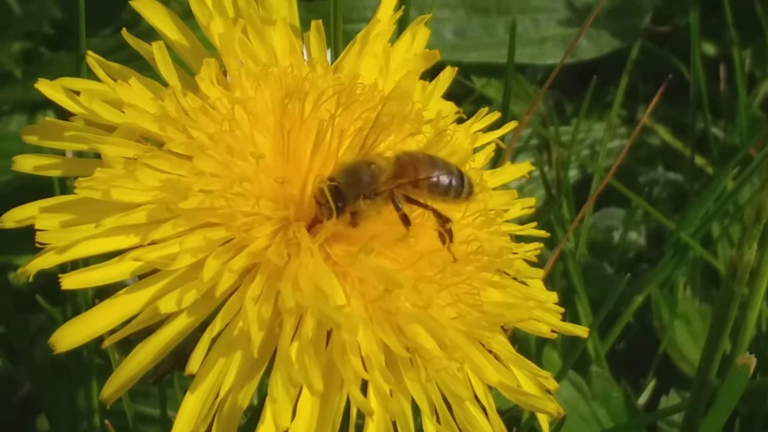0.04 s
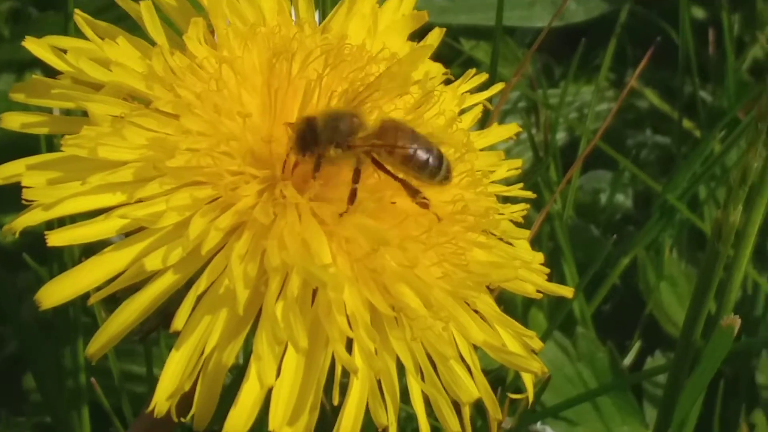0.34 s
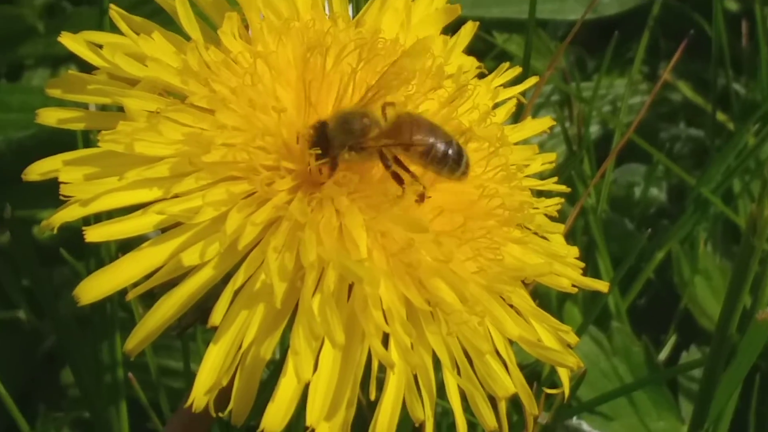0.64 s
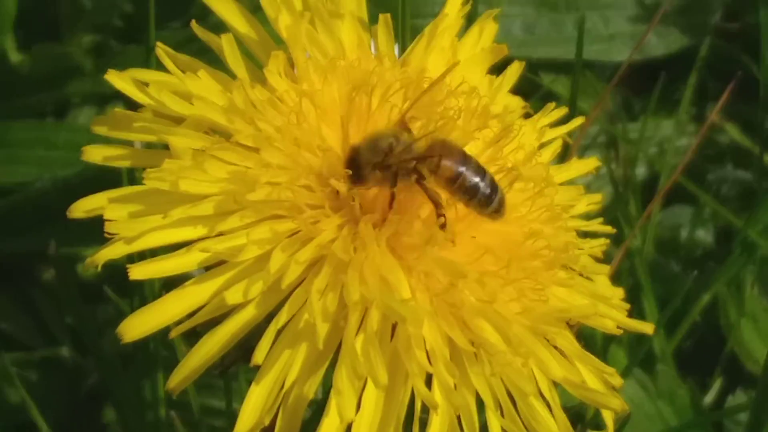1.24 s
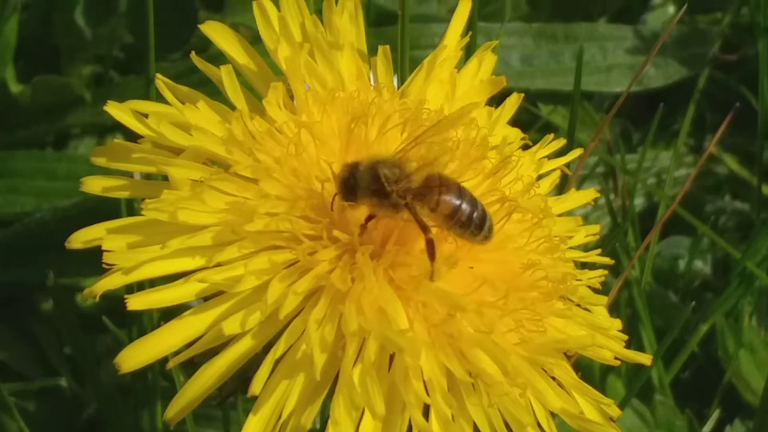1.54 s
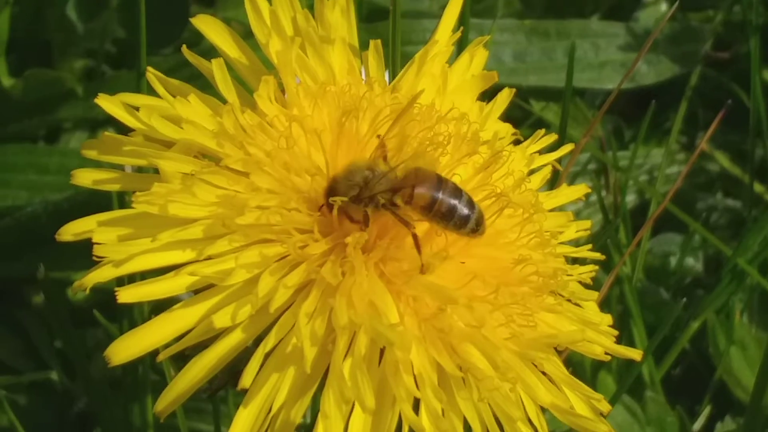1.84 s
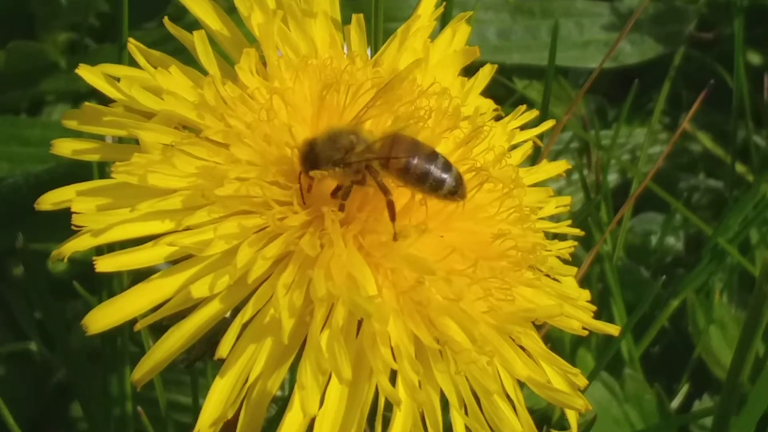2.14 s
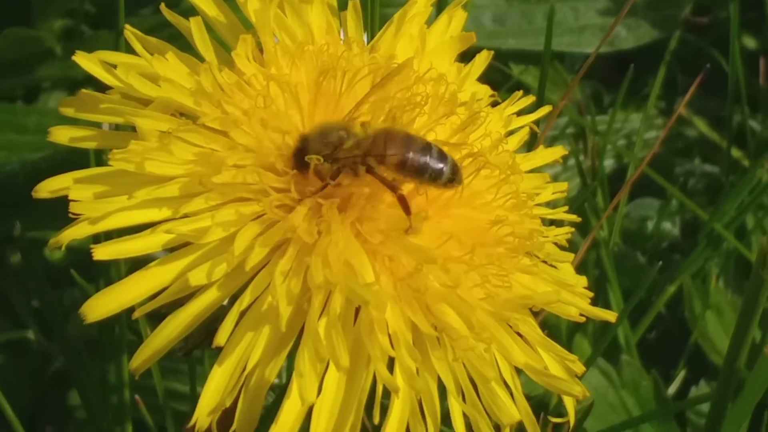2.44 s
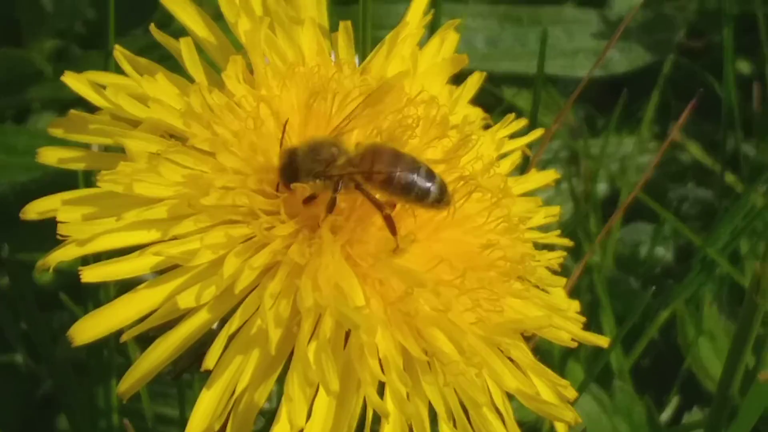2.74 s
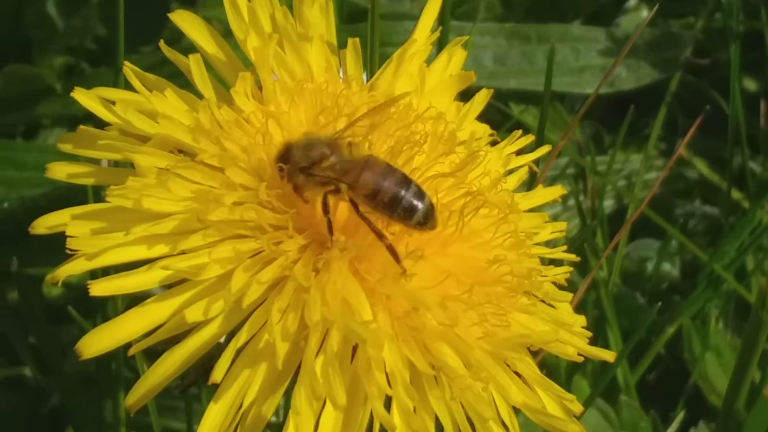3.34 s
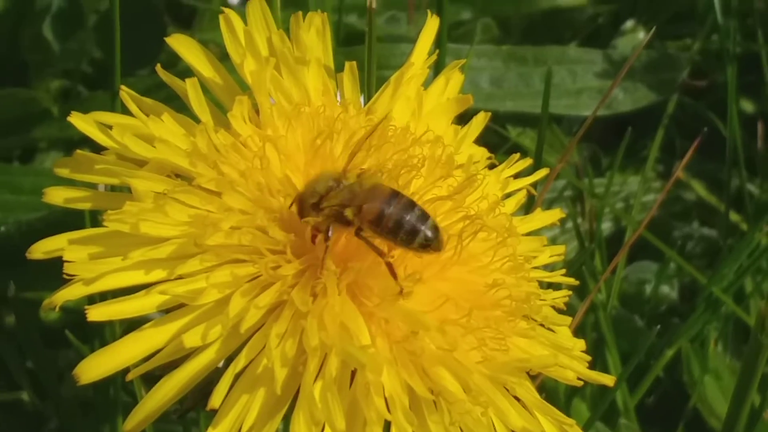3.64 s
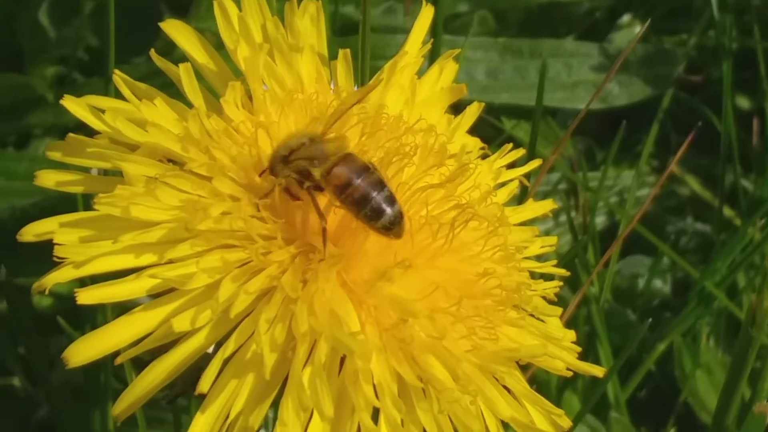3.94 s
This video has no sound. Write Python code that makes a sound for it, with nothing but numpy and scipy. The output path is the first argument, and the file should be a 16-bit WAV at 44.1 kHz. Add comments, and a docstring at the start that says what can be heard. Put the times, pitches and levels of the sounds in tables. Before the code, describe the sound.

Faint birdsong, with falling trills and thin whistles, over soft outdoor rumble and hiss.

```python
"""A quiet meadow over low rumble and hiss; far chirps, grass ticks and soft taps on a hand-held camera
dot it throughout. At 0.5 s a songbird gives a falling trill of quick upward flicks. Something, perhaps
a frog, rattles at 1.0 and 2.7 s: clicks ringing in a throat. A second, nearer trill falls at 2.9 s.
From 3.1 s a mellow whistle climbs; from 3.3 s another bird gives three thin whistles.
At 3.8 s the camera takes one bump with a short scrape."""
import sys
import numpy as np
from scipy import signal
from scipy.fft import rfft, irfft, next_fast_len
from scipy.io import wavfile
from scipy.ndimage import map_coordinates

SR = 44100
rng = np.random.default_rng(int(sys.argv[2]) if len(sys.argv) > 2 else 0)


def master_out(mix):
    """Clip the mix to full scale and print it as 16-bit PCM to the path in sys.argv[1]."""
    frames = np.transpose(np.atleast_2d(mix))
    ceiling = np.clip(frames, -1, 1)
    pcm = np.round(ceiling * 32767).astype(np.int16)
    wavfile.write(sys.argv[1], SR, pcm)


N = 176400
TIME_S = np.arange(N) / SR


def amp(db):
    """Decibels to gain."""
    return 10 ** (np.asarray(db) / 20)


def unit(x):
    """Scale to rms 1."""
    return x / np.sqrt(np.mean(x ** 2) + 1e-20)


def along(points, hz):
    """Read (freq_hz, value) points on a log frequency axis."""
    freq_hz, values = np.transpose(points)
    return np.interp(np.log(hz + 1), np.log(freq_hz + 1), values)


def curves(rows, t):
    """Each column after time_s, read at times t."""
    time_s, *columns = np.transpose(rows)
    return [np.interp(t, time_s, column) for column in columns]


def clock(length_s):
    """Sample times of a span."""
    return np.arange(int(length_s * SR)) / SR


def wobble(rate_hz, size=N):
    """Smooth random curve, rate_hz knots a second."""
    return map_coordinates(rng.standard_normal(N // 20), [np.arange(size) * rate_hz / SR])


def filtered(x, response):
    """Apply a gain given as a function of frequency."""
    size = next_fast_len(N + SR // 2)
    return irfft(rfft(x, size) * response(np.fft.rfftfreq(size, 1 / SR)), size)[..., :N]


def noise(colour):
    """Coloured noise of rms 1."""
    return unit(filtered(rng.standard_normal(N), lambda hz: amp(along(colour, hz))))


def add(out, start_s, x):
    """Mix x into out."""
    part = out[max(0, round(start_s * SR)):][:len(x)]
    part += x[:len(part)]


def tone(hz):
    """Sine of rms 1 following a pitch."""
    return np.sqrt(2) * np.sin(2 * np.pi * np.cumsum(hz) / SR)


def struck(colour, size=16384):
    """Minimum-phase impulse response with this spectrum."""
    cepstrum = irfft(np.log(amp(along(colour, np.fft.rfftfreq(size, 1 / SR)))))
    cepstrum[1:size // 2] *= 2
    cepstrum[size // 2 + 1:] = 0
    return irfft(np.exp(rfft(cepstrum)))


def knocks(rows):
    """Small contacts, each a few swings that swell and die."""
    out, t = np.zeros(N), clock(1 / 8)
    for start_s, pitch_hz, swell_s, level_db in rows:
        u = t / swell_s
        envelope = amp(level_db) * (u * np.exp(1 - u)) ** 3
        add(out, start_s, envelope * np.sin(2 * np.pi * pitch_hz * t))
    return out


def meadow(x, wet_db):
    """Add quick scatter from plants and a longer echo from trees."""
    t = clock(.6)

    def tail(t60_s):
        envelope = amp(-60 * t / t60_s) * (1 - np.exp(-t / .01))
        return unit(rng.standard_normal(len(t)) * envelope) / np.sqrt(len(t))

    scatter = amp(-5.5) * tail(t60_s=.099)
    echo = amp(-7) * tail(t60_s=.46)
    return x + amp(wet_db) * signal.fftconvolve(x, scatter + echo)[:len(x)]


def rumble():
    """Uneven low noise with a wavering drone."""
    # rumble spectrum: freq_hz, gain_db
    colour = [(15, -45), (25, -21.5), (45, -7), (65, 1.5), (92, -2.5), (186, -7), (244, -8.5), (330, -18),
              (401, -23), (445, -24.5), (619, -33), (786, -35.5), (900, -33), (1170, -61), (1980, -120)]
    # rumble contour: time_s, relative_db
    contour = [(0.0, -56.5), (0.32, -61.5), (0.36, -58.5), (1.03, -63.5), (1.21, -57), (1.3, -61.5),
               (1.67, -66.5), (1.7, -63), (1.72, -63.5), (2.3, -66), (2.41, -61.5), (2.6, -67.5),
               (3.04, -60.5), (3.48, -65.5), (3.71, -64.5), (3.75, -58.5)]
    drone_hz, drone_db = 62.6, -65
    low = amp(curves(contour, TIME_S)[0] + .5 + 1.53 * wobble(17)) * noise(colour)
    drone = amp(drone_db + 2.5 * wobble(11)) * tone(drone_hz + 3.47 * wobble(12))
    return low + drone


def rustle():
    """Soft flickering noise in the low mids."""
    # rustle contour: time_s, relative_db
    contour = [(0.0, -77), (0.08, -73), (0.31, -72.5), (0.59, -80), (0.87, -78), (1.26, -73.5),
               (1.42, -77.5), (1.83, -81), (2.51, -79), (3.08, -77.5), (3.3, -81.5), (3.48, -79),
               (3.75, -75)]
    # rustle spectrum: freq_hz, gain_db
    colour = [(150, -30), (380, -1), (560, -3.5), (800, -7.5), (1300, -15), (2500, -36.5)]
    return amp(curves(contour, TIME_S)[0] - 3.5 + 2.4 * wobble(40)) * noise(colour)


def chorus():
    """Far birds blurred into a wash of treble noise."""
    # chorus contour: time_s, relative_db
    contour = [(0, -85), (.5, -81), (.9, -86), (1.1, -78.5), (1.45, -86.5), (1.65, -93), (2.55, -92),
               (2.65, -84), (2.86, -76), (2.95, -81.5), (3.4, -81.5), (4, -83.5)]
    # chorus spectrum: freq_hz, gain_db
    colour = [(2000, -45), (3000, -4), (3600, 1.5), (4400, -8.5), (5100, -1), (6500, -6), (7500, -33)]
    return amp(curves(contour, TIME_S)[0] + 1.5 + 1.4 * wobble(50)) * noise(colour)


def hiss(level_db=-72.5):
    """Steady air and microphone hiss, wider in the treble."""
    # hiss spectrum: freq_hz, gain_db
    colour = [(410, -40), (700, -4), (777, -4.5), (919, -8), (1070, -3.5), (1180, -6), (1810, -5.5),
              (1950, -6), (2250, -7), (2530, -6.5), (3330, -8), (3890, -5.5), (6280, -11), (9160, -14),
              (15600, -6)]
    # left-right likeness: freq_hz, correlation
    likeness = [(1000, 0.93), (4000, 1), (6500, 0.66), (9000, 0.24), (15000, 0.74)]

    def mid_side_gains(hz):
        angle_rad = np.arccos(np.clip(along(likeness, hz), -1, 1)) / 2
        return np.array([np.cos(angle_rad), np.sin(angle_rad)])

    mid, side = filtered(np.array([noise(colour), noise(colour)]), mid_side_gains)
    return amp(level_db) * np.array([mid + side, mid - side])


def chirps(rough_hz=130):
    """Short rough glides from far birds."""
    # distant calls: start_s, length_s, first_hz, last_hz, level_db
    glides = [(0, 0.045, 3380, 3600, -76), (.12, 0.028, 5200, 5300, -77.5), (.255, .03, 5050, 5400, -77),
              (.31, 0.031, 3700, 3540, -78), (0.316, .018, 6600, 5860, -78.5),
              (0.932, 0.023, 3850, 3320, -77), (.97, 0.065, 3230, 3060, -78),
              (1.413, 0.063, 3720, 4030, -76.5), (1.504, 0.025, 4270, 3780, -77.5),
              (1.786, .02, 6500, 5700, -80), (1.907, .028, 6500, 5750, -76),
              (2.042, 0.029, 6550, 5650, -71), (2.503, 0.042, 5000, 4800, -79),
              (2.6, 0.099, 3930, 3360, -76.5), (2.728, 0.076, 3310, 4450, -71),
              (2.766, .05, 3400, 3900, -76), (2.91, .13, 780, 797, -75.5), (3.0, .1, 3700, 3500, -72),
              (3.56, .08, 2520, 2670, -80.5), (3.679, 0.06, 2070, 1800, -78.5)]
    out = np.zeros(N)
    for start_s, length_s, first_hz, last_hz, level_db in glides:
        u = clock(length_s) / length_s
        pitch_hz = first_hz + (last_hz - first_hz) * u + rough_hz * wobble(500, len(u))
        add(out, start_s, amp(level_db) * np.sin(np.pi * u) * tone(pitch_hz))
    return out


def grass_ticks():
    """Tiny dry contacts in the grass."""
    # ticks: start_s, pitch_hz, swell_s, level_db
    ticks = [(.074, 5700, .0004, -61), (.433, 6200, .0004, -60.5), (.885, 2500, 0.00054, -56),
             (.8853, 4700, 0.0002, -52.5), (2.2261, 1500, .0004, -61), (2.5961, 1580, 0.00092, -47.5),
             (2.803, 5200, .0003, -62), (2.838, 6100, 0.00037, -58.5), (3.524, 6100, .0004, -62)]
    return knocks(ticks)


def camera_taps():
    """Soft low knocks on the hand-held camera."""
    # taps: start_s, pitch_hz, swell_s, level_db
    taps = [(.3808, 280, 0.0013, -42.5), (.3812, 604, 0.0014, -52.5), (.515, 800, 0.0025, -63.5),
            (1.15, 705, 0.002, -61.5), (1.172, 193, 0.01, -50), (1.193, 197, 0.01, -52),
            (1.197, 401, 0.0074, -57.5), (1.375, 362, .006, -60), (1.69, 115, 0.01, -47),
            (1.753, 130, 0.0085, -51.5), (2.2257, 600, 0.00085, -54), (2.843, 148, .014, -54.5),
            (3.01, 209.7, .025, -57)]
    return knocks(taps)


def trill(contour, start_s, gap_s, count):
    """Upward flicks that slow as their pitch sinks, each scattered anew by the plants."""
    syllable_s, slowing_s, jitter_s, rough_hz = .021, .00023, .0007, 70
    out = np.zeros(N)
    u = clock(syllable_s) / syllable_s
    flick = u ** 3 + u / 2  # steepest at the end
    flick -= flick[len(u) // 2]
    for k in range(count):
        centre_s = start_s + gap_s * k + slowing_s * k * k + jitter_s * rng.normal()
        centre_hz, sweep_hz, level_db = curves(contour, centre_s)
        pitch_hz = centre_hz + sweep_hz * flick + rough_hz * wobble(725, len(u))
        syllable = amp(level_db - .5 + rng.normal()) * np.sin(np.pi * u) * tone(pitch_hz)
        add(out, centre_s - syllable_s / 2, meadow(np.pad(syllable, (0, SR // 3)), wet_db=1))
    return out


def songbird():
    """Two falling trills, far then near."""
    # far trill contour: time_s, pitch_hz, sweep_scale_hz, relative_db
    far = [(.46, 5100, 1000, -82), (.55, 4100, 900, -73.5), (.615, 3680, 800, -69), (.68, 3460, 950, -68.5),
           (.725, 3187, 750, -65), (.79, 3080, 650, -65.5), (.825, 2870, 500, -76)]
    # near trill contour: time_s, pitch_hz, sweep_scale_hz, relative_db
    near = [(2.93, 5700, 500, -66), (2.96, 5380, 750, -66), (3.003, 4940, 1000, -64),
            (3.035, 4350, 1420, -63.5), (3.08, 4170, 1200, -63), (3.112, 3940, 650, -58),
            (3.19, 3510, 560, -57.5), (3.245, 3360, 604, -62.5), (3.29, 3235, 550, -66.5)]
    first = trill(far, start_s=.468, gap_s=.018, count=18)
    second = trill(near, start_s=2.936, gap_s=.0153, count=19)
    return first + second


def rattles(burst_gap_s=.03335, click_gap_s=.0022, clicks=5):
    """Thirty bursts a second, each a few clicks ringing in the throat."""
    # rattles: start_s, length_s, relative_db
    calls = [(1.017, .45, -60.5), (2.651, .45, -60)]
    # throat resonances: freq_hz, gain_db
    throat = [(900, -40), (1350, -14.5), (1650, -2), (1830, 2), (2050, 0), (2280, -5.5), (2700, -22),
              (3300, -10.5), (3900, -6), (4500, -20.5), (5500, -16), (6500, -19.5), (8000, -46)]
    out, click = np.zeros(N), struck(throat, size=1024)
    click /= np.abs(click).max()
    for start_s, length_s, level_db in calls:
        for burst_s in np.arange(start_s, start_s + length_s, burst_gap_s):
            gap_s = click_gap_s * (1 + .018 * rng.normal())
            for k in range(clicks):
                gain = amp(level_db + 2.2 * rng.normal()) * np.sin(np.pi * (k + .5) / clicks)
                add(out, burst_s + k * gap_s, gain * click)
    return out


def climbing_whistle(flutter_db=2, waver_hz=22):
    """Slurred mellow notes that climb; the last drops back."""
    # note contours, one list a note: time_s, pitch_hz, level_db
    notes = [
        [(3.11, 2020, -82), (3.15, 2114, -76), (3.22, 2355, -80)],
        [(3.245, 2170, -77), (3.3, 1935, -75.5), (3.335, 2150, -74), (3.37, 2320, -77.5), (3.415, 2490, -77)],
        [(3.44, 2680, -87), (3.51, 2760, -77), (3.55, 2800, -82)],
        [(3.5, 2980, -79), (3.57, 3170, -77), (3.615, 3340, -72), (3.636, 3386, -61.5), (3.68, 3480, -62),
         (3.72, 3560, -64), (3.76, 3500, -70), (3.79, 3530, -75)],
        [(3.93, 3050, -85), (3.975, 3130, -83), (4, 3200, -77)],
    ]
    out = np.zeros(N)
    for note in notes:
        start_s, end_s = note[0][0], note[-1][0]
        t = start_s + clock(end_s - start_s)
        pitch_hz, level_db = curves(note, t)
        envelope = amp(level_db + flutter_db * wobble(43.7, len(t))) * signal.windows.tukey(len(t), .15)
        add(out, start_s, envelope * tone(pitch_hz + waver_hz * wobble(117.5, len(t))))
    return out


def thin_whistles(waver_hz=24, swell_db=4.4):
    """A bird's high pure notes that sag and swell."""
    # whistles: start_s, length_s, first_hz, last_hz, relative_db
    notes = [(3.278, 0.17, 8020, 7280, -68), (3.524, 0.19, 7930, 7260, -66), (3.776, .155, 7730, 7230, -66)]
    out = np.zeros(N)
    for start_s, length_s, first_hz, last_hz, level_db in notes:
        u = clock(length_s) / length_s
        pitch_hz = last_hz + (first_hz - last_hz) * (1 - u) ** 1.3 + waver_hz * wobble(70, len(u))
        envelope = amp(level_db + swell_db * (u - 2)) * signal.windows.tukey(len(u), .2)
        add(out, start_s, envelope * tone(pitch_hz))
    return out


def camera_bump(start_s=3.7795):
    """A bump on the camera: a low, briefly ringing thud, a short scrape and a faint dying hiss."""
    # thud spectrum: freq_hz, gain_db
    thud_colour = [(22, -26), (35, -4), (45, 20.5), (62, 32), (80, 24.5), (125, 28.5), (215, 22.5),
                   (260, 11), (320, 8), (400, 10), (560, 13), (800, 11.5), (950, 1), (1300, -17.5),
                   (2200, -27), (6000, -52)]
    # scrape spectrum: freq_hz, gain_db
    scrape_colour = [(530, -8.5), (900, -5.5), (1650, -12), (2860, -7), (3540, -0.5), (4330, -8.5),
                     (4660, -9.5), (5000, -11.5), (8650, -35.5), (10800, -23.5), (15500, -37)]
    # dying hiss spectrum: freq_hz, gain_db
    tail_colour = [(180, -28), (300, -2), (769, -1.5), (3750, -11.5), (7020, -11), (7500, -14), (8280, -25),
                   (15500, -18)]
    rise_s, scrape_s, release_s, sag_db_per_s, tail_t60_s = .0055, .02, .0036, 340, .28
    thud, t = np.zeros(N), np.maximum(TIME_S - start_s, 0)
    add(thud, start_s, struck(thud_colour))
    attack = np.sqrt(np.clip(t / rise_s, 0, 1))
    release = np.clip((scrape_s - t) / release_s + 1, 0, 1)
    scrape = attack * release * amp(-33.5 - sag_db_per_s * t + 2.3 * wobble(900)) * noise(scrape_colour)
    tail = np.clip(t / scrape_s, 0, 1) * amp(-51.5 - 60 * t / tail_t60_s) * noise(tail_colour)
    return thud + scrape + tail


def scene():
    """Calls and ticks across the meadow, handling noise close by, and the background."""
    calls = songbird() + meadow(thin_whistles(), wet_db=-5) + meadow(climbing_whistle(), wet_db=-4)
    calls += meadow(chirps(), wet_db=-1) + meadow(rattles(), wet_db=-.5)
    contacts = camera_taps() + meadow(grass_ticks(), wet_db=-2.5) + camera_bump()
    return calls + contacts + rumble() + rustle() + chorus() + hiss()


def record(dry):
    """The camera sheds the deepest bass and keeps nothing above its band limit."""
    low_cut_hz, top_hz = 28, 15750
    return filtered(dry, lambda hz: (hz < top_hz) * (1 - 1 / np.sqrt(1 + (hz / low_cut_hz) ** 12)))


dry = scene()
out = record(dry)
master_out(out)
```